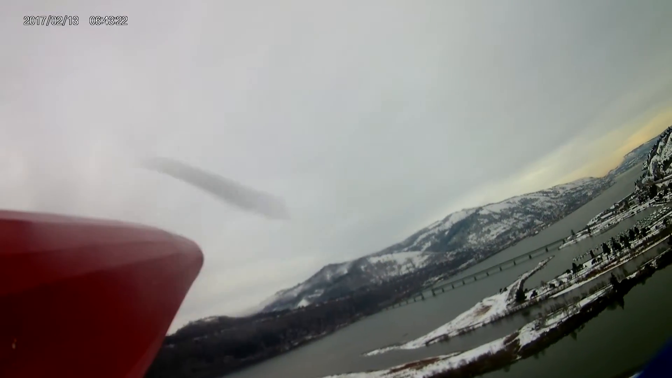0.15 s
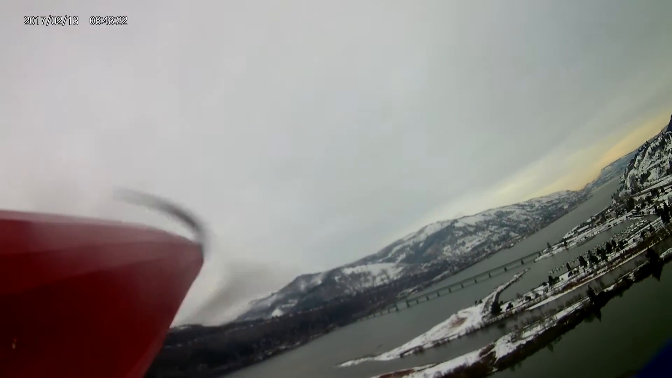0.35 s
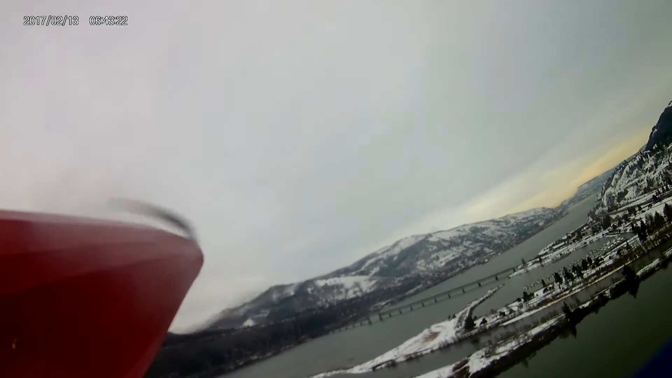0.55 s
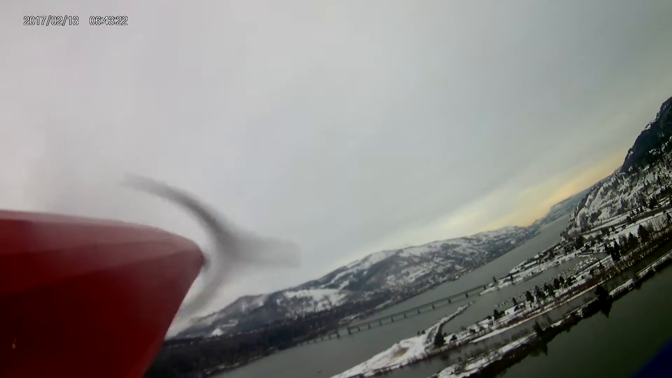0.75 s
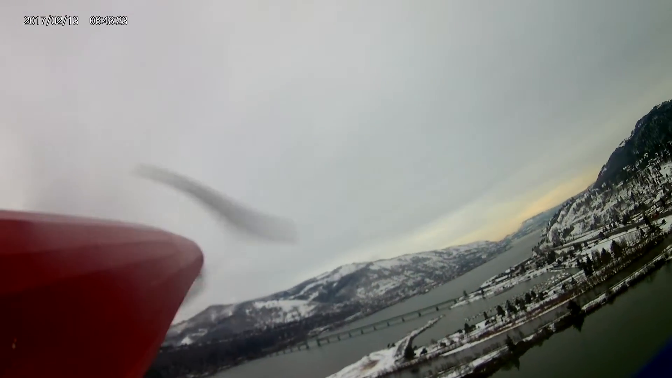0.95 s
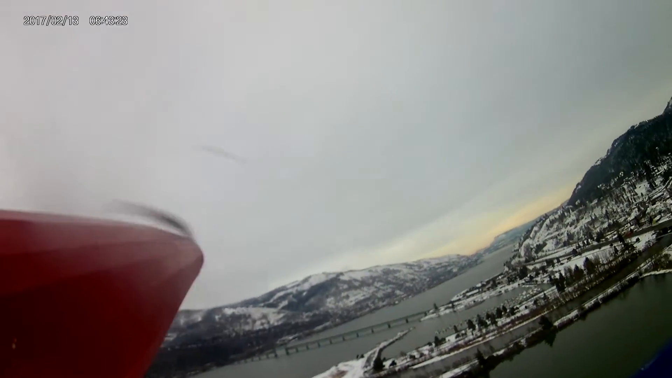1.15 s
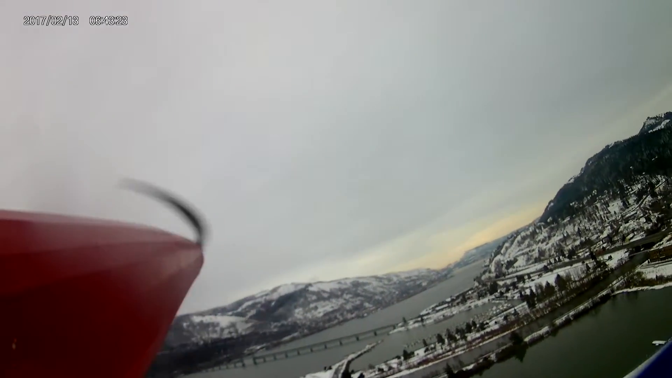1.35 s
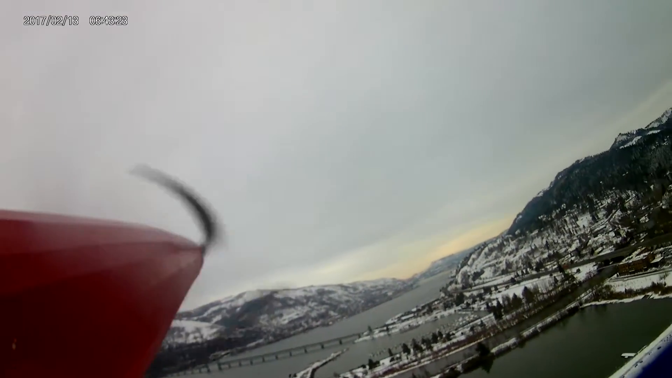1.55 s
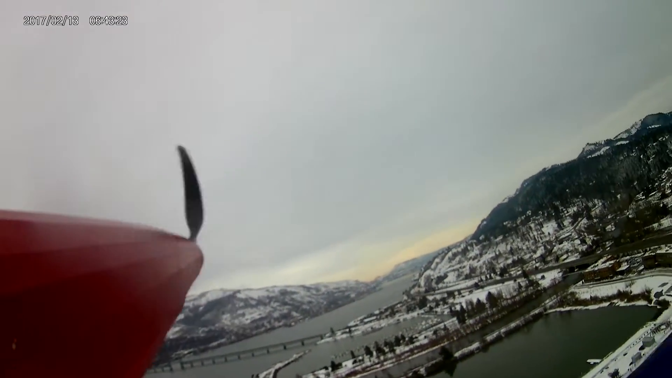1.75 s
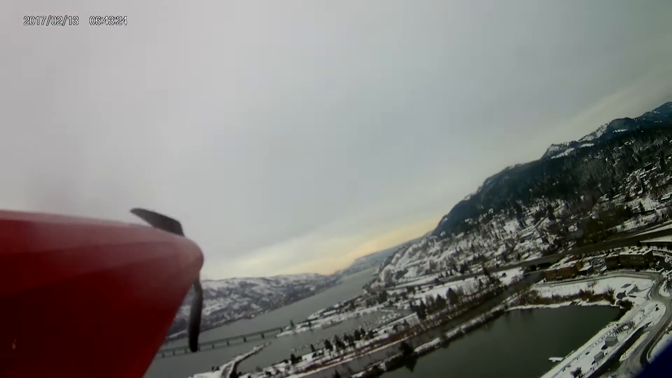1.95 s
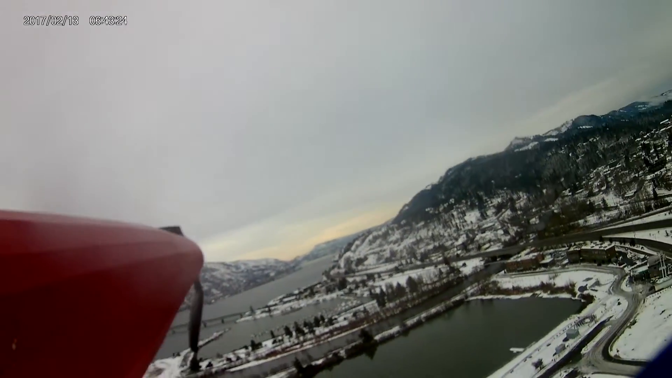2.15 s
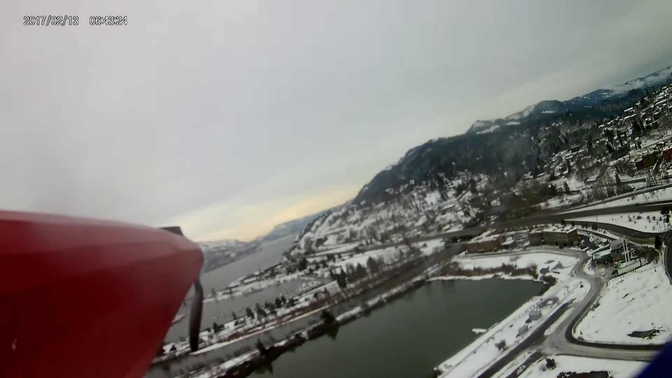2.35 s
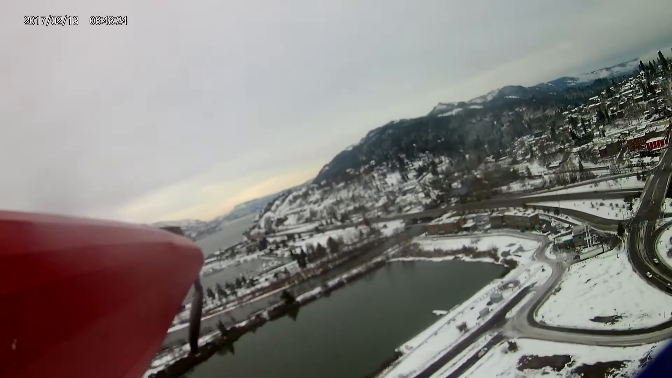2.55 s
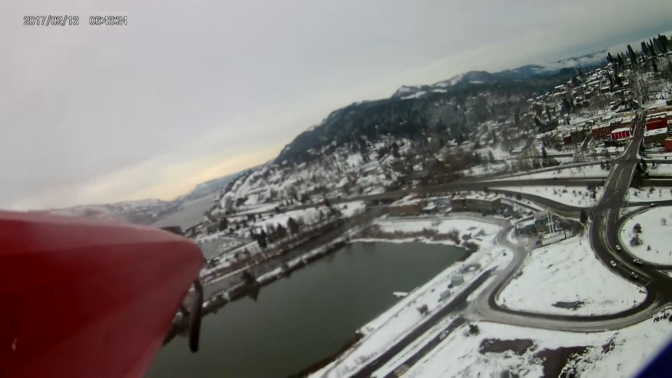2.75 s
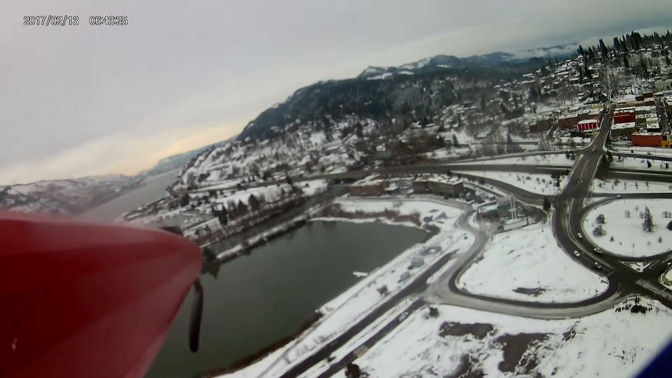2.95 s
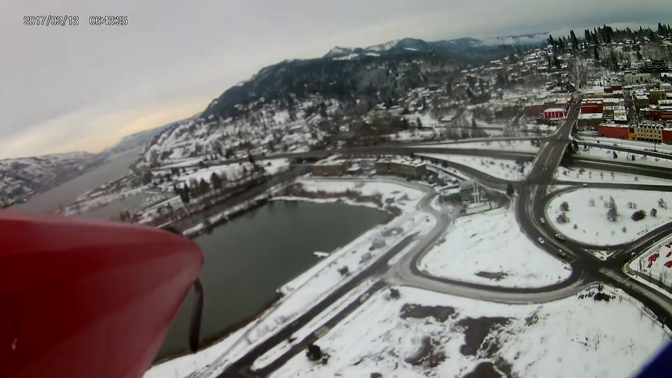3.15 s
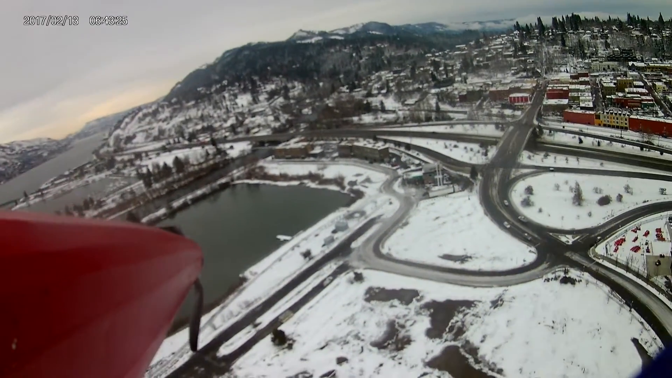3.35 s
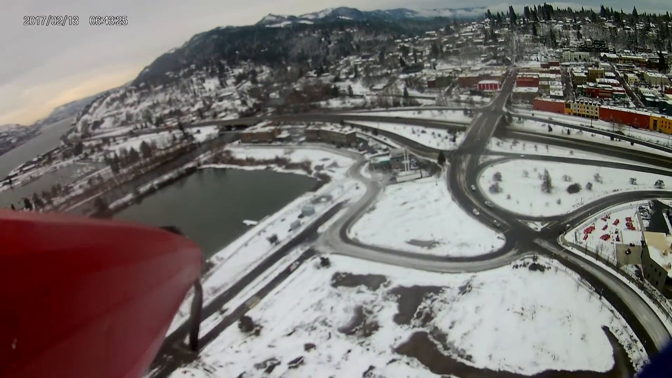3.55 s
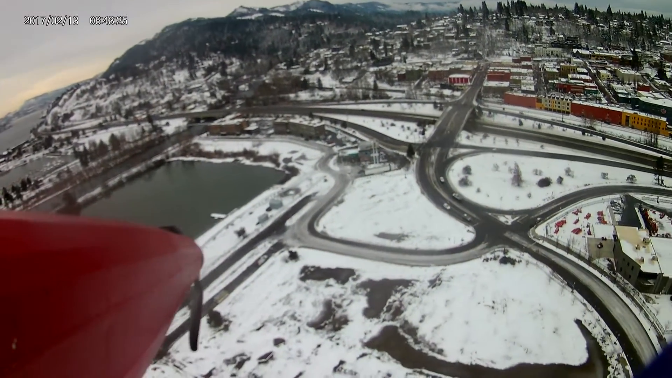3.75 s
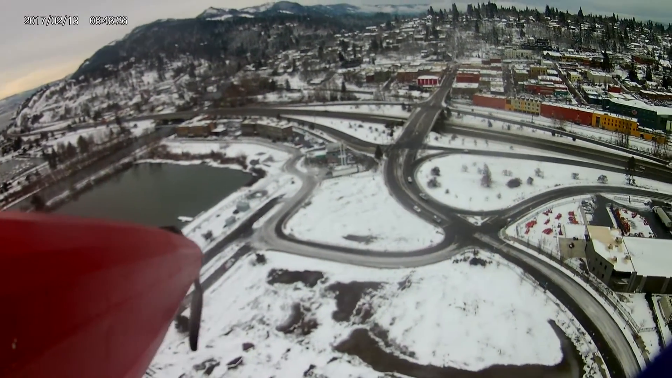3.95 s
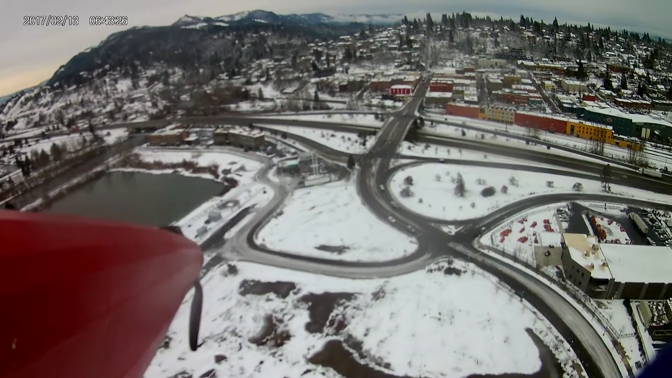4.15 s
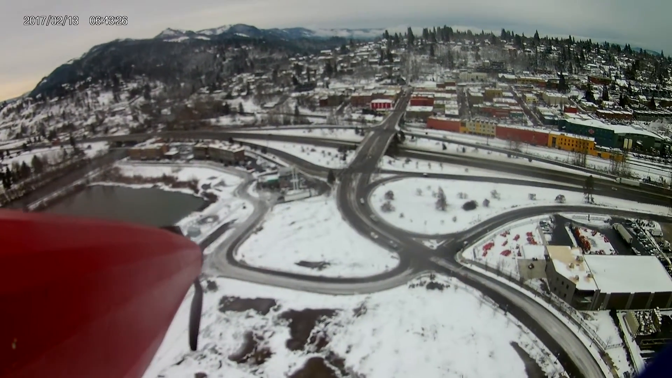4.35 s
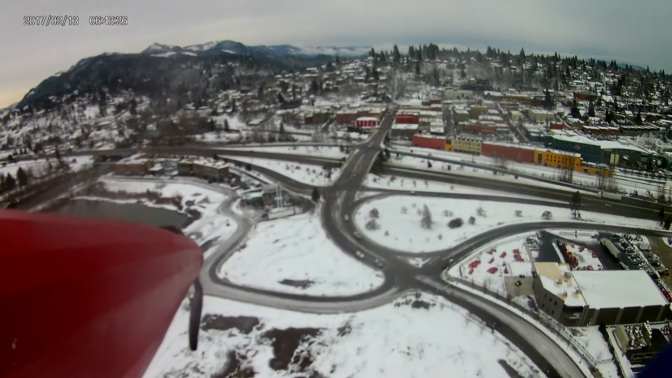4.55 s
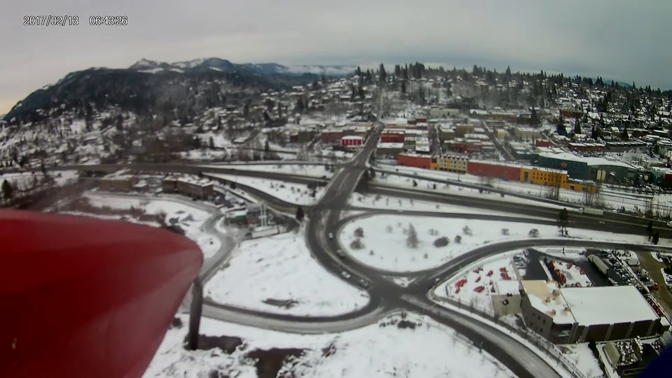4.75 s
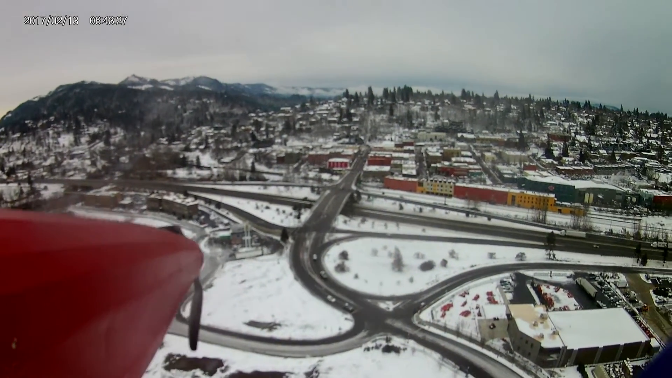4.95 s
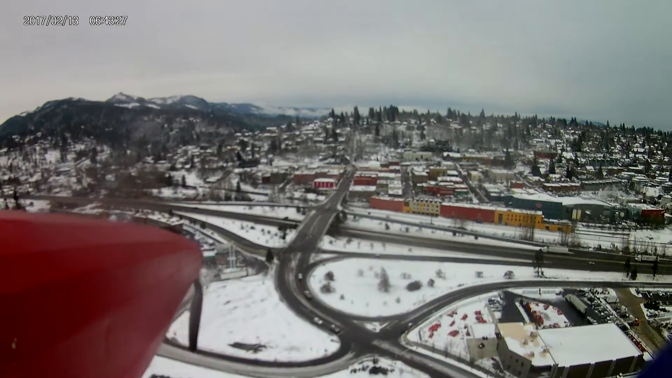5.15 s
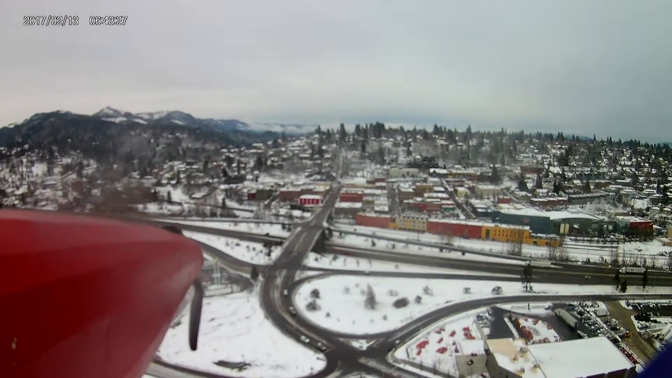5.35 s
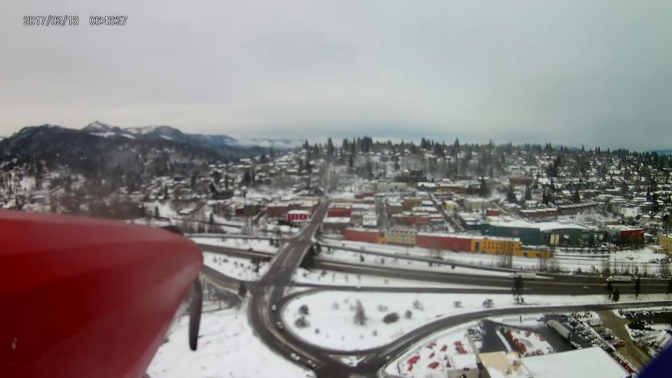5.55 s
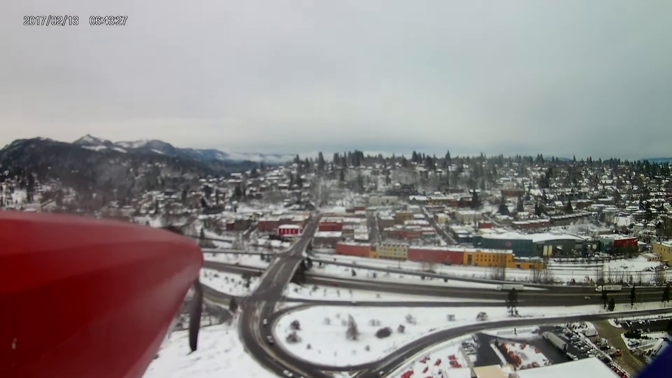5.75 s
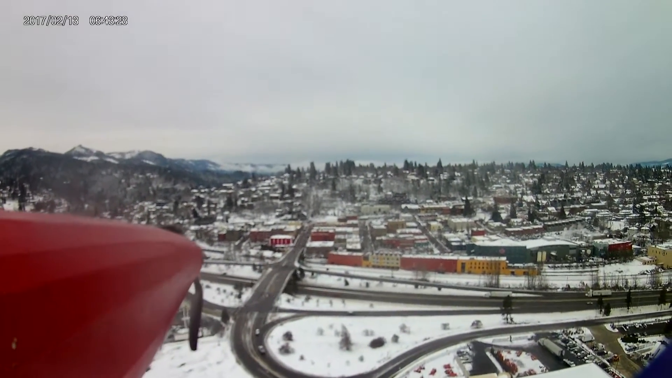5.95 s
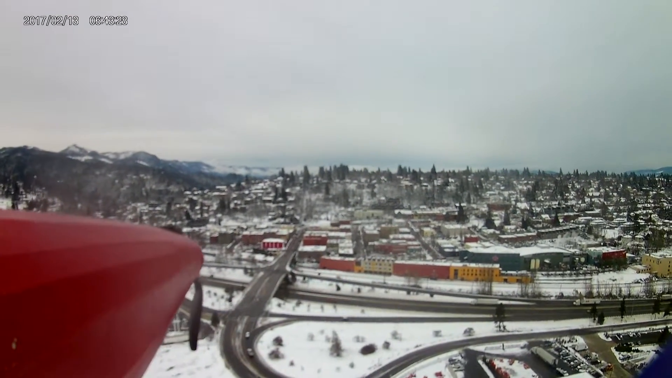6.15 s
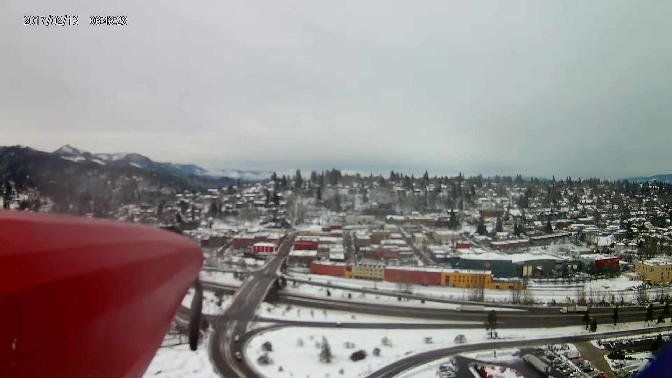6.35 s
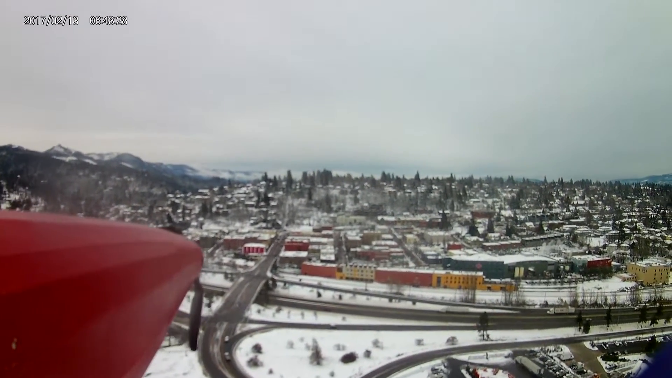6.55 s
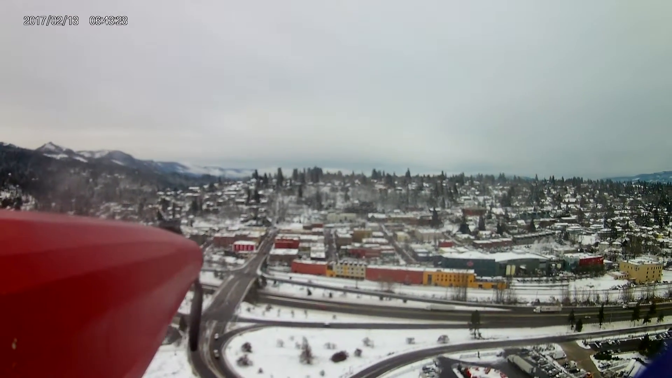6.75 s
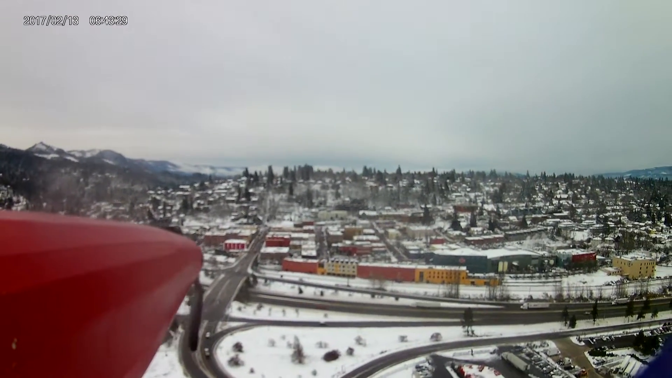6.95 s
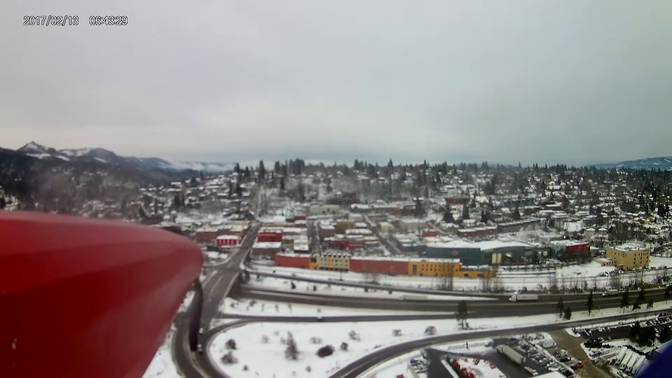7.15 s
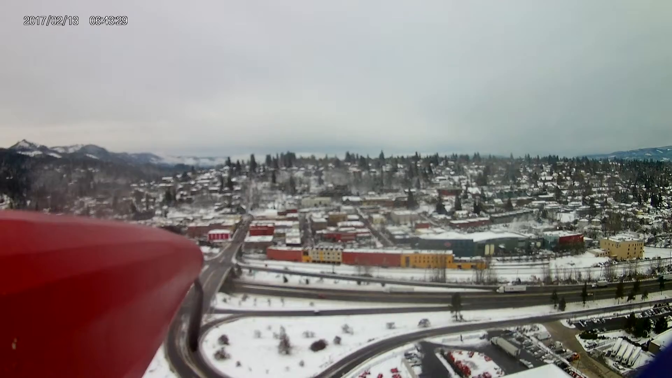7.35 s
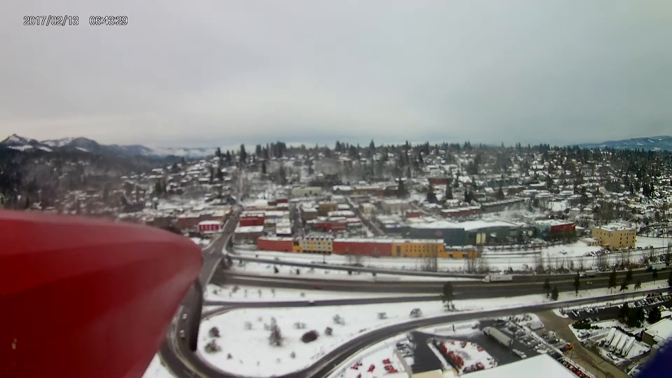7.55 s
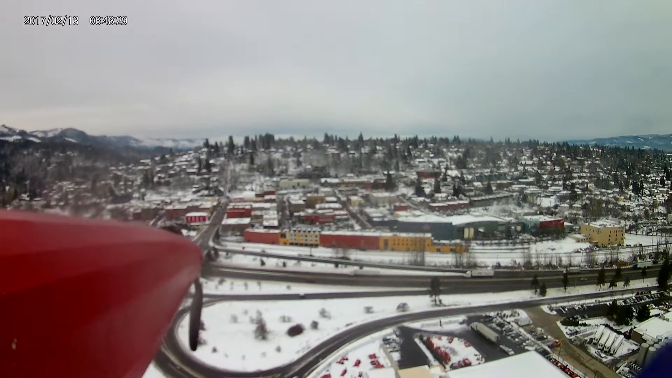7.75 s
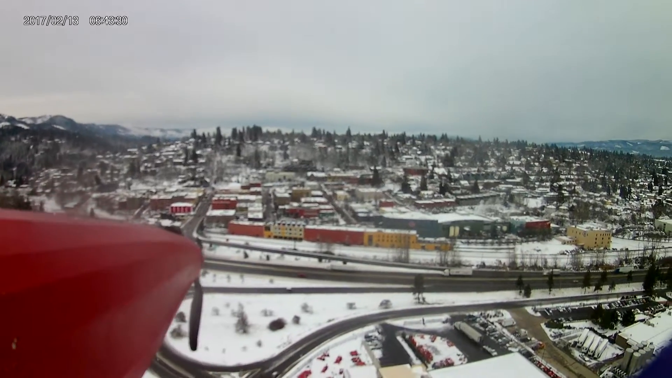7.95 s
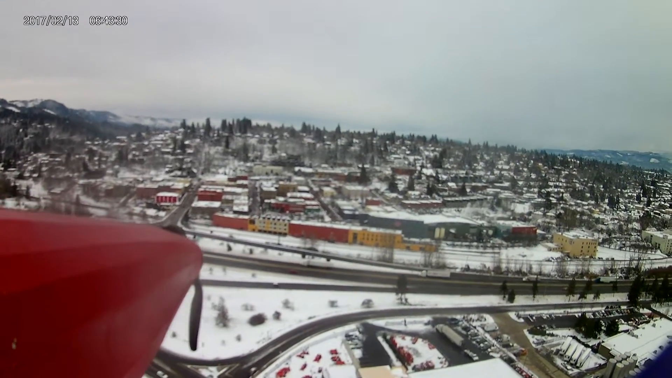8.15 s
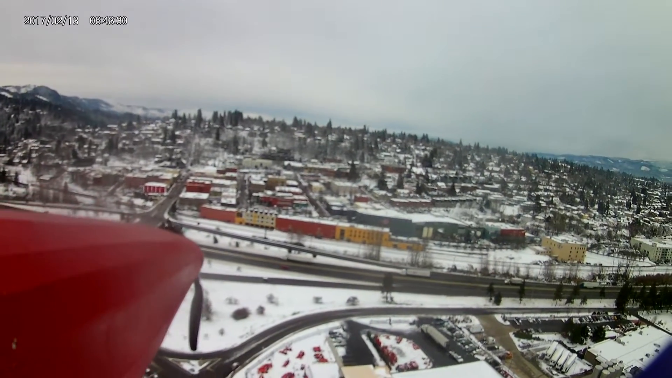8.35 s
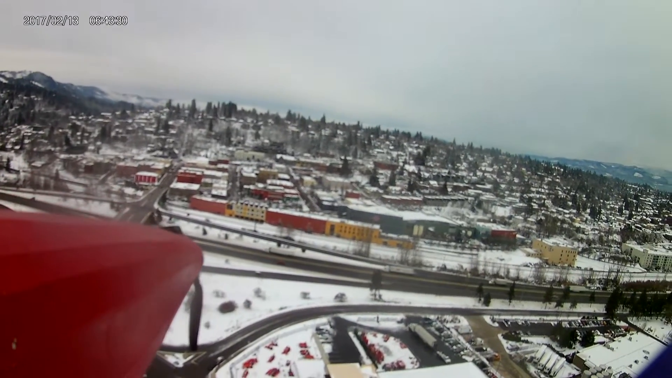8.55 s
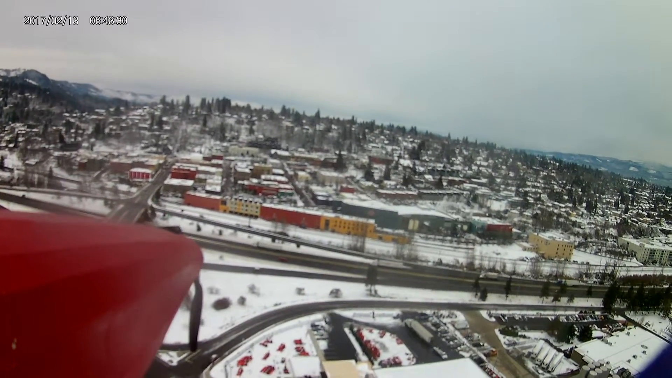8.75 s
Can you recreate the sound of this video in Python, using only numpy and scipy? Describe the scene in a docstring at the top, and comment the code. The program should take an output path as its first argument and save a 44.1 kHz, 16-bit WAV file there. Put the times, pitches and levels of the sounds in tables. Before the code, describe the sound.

A small electric motor and two-blade propeller buzz deeply and buffet the airframe, with two rougher swells. The pitch sags, then drops quickly through a braking chirp to nothing. Faint plastic ticks follow as the blades fold back. After that there is only wind over the glider, soft at first, building to a fuller, brighter rush, then easing. Close onboard microphone, outdoors, no echo.

```python
"""On board a model glider: an electric motor drives a two-blade folding propeller whose wash buffets the fuselage.
One shaft angle times the blade tones, the pulsing wash and hiss, and the motor whine; a speed controller sizzles.
The throttle closes, the brake stops the shaft with a falling chirp and the blades fold back with two ticks.
Then only air rushes over the airframe: banded noise, louder and brighter as the glider gathers speed."""
import sys
import numpy as np
from scipy import signal
from scipy.fft import rfft, irfft
from scipy.io import wavfile

SR = 44100
rng = np.random.default_rng(int(sys.argv[2]) if len(sys.argv) > 2 else 0)


def dump(signal):
    """Clip the signal to [-1, 1] and save it as 16-bit WAV at the path in sys.argv[1]."""
    limited = np.clip(np.atleast_2d(signal).T, -1, 1)
    pcm = np.round(limited * 32767).astype(np.int16)
    wavfile.write(sys.argv[1], SR, pcm)


N = 388080
TIME = np.arange(N) / SR

# Shaft under power, coasting, then braked. Each row: time in seconds, speed in turns per second.
SHAFT_SPEED = [(0, 132.4), (.42, 127.6), (.5, 123.7), (.88, 123.3), (1.04, 121.2), (1.21, 121.1),
               (1.31, 98), (1.44, 86.5), (1.57, 83.3), (1.68, 61), (1.74, 38), (1.755, 19), (1.82, 0)]
# Rough air met by the propeller. Each row: start in seconds, end in seconds, level added to the wash in dB.
ROUGH_AIR = [(-.05, .285, 6.5), (0.207, 0.262, 4.5), (0.698, 1.29, 6)]
# Propeller tones. Each row: multiple of the shaft rate, relative level in dB, waver in dB.
PROP_ORDERS = [(1, -9, 2.5), (2, 0.5, -0.16), (3, -20.5, 3), (4, -22.5, 3), (6, -34.5, 3.5),
               (13, -34.5, 3.5)]
# Turbulent wash on the fuselage. Each row: frequency in Hz, relative density in dB per Hz.
WASH_COLOUR = [(20, -26), (40, -14), (62, -6), (95, -1.5), (125, -5.5), (180, -0.5), (260, -7.5),
               (370, -7.5), (520, -21), (750, -23), (1200, -47), (3000, -73)]
# Hiss of the running motor. Each row: frequency in Hz, relative density in dB per Hz.
HISS_COLOUR = [(600, -21), (1700, 5), (2600, 2), (4000, -1), (5200, -2.5), (6500, -11), (8500, -16),
               (12000, -20.5)]
# Sizzle of the speed controller. Each row: frequency in Hz, relative density in dB per Hz.
SIZZLE_COLOUR = [(2000, -15), (5000, 3.5), (8500, -5), (12000, -4)]
# Strength of the airflow, following the airspeed. Each row: time in seconds, strength in dB.
AIRFLOW_STRENGTH = [(0, -30.5), (1.35, -32.5), (1.85, -40.5), (2.2, -43), (3.08, -43), (3.75, -36),
                    (4.7, -31.5), (5.55, -31.5), (6.45, -33), (7.3, -37), (8.8, -36)]
# Air at cruising strength. Each row: frequency in Hz, relative density in dB per Hz.
AIR_COLOUR = [(20, -9), (50, -2.5), (110, 0.76), (170, 0.5), (330, -2.5), (600, -5), (1000, -7.5),
              (1600, -10), (3000, -19.5), (4500, -22.5), (5500, -27), (6500, -33), (9000, -42),
              (12000, -49.5)]
# Faster air makes smaller eddies. Each row: frequency in Hz, gain in dB per dB of airflow.
AIR_GROWTH = [(40, 0.3), (120, 0.7), (300, 0.63), (700, 0.73), (1400, 1.0), (2800, 1.24), (5000, 1.26),
              (9000, 1.6)]
# Motor mount resonances swept by the braked windings. Each row: centre in Hz, width in Hz, level in dB.
MOUNT_MODES = [(227, 59, -28.5), (635, 150, -27), (814, 140, -37)]
# Folding blades touch the nose. Each row: time in seconds, level in dB.
FOLD_TICKS = [(1.9145, -39), (1.924, -34.5), (1.9265, -45), (2.0435, -41), (2.046, -45)]
# Tick of a blade. Each row: frequency in Hz, relative density in dB per Hz.
TICK_COLOUR = [(1000, -20), (3300, 3), (4900, 3), (7000, -12), (9000, -17), (11500, -9)]

REFERENCE_TURNS_PER_S = 124
# levels at reference speed in smooth air; exponents of shaft speed
TONE_DB, TONE_POWER = -14.5, 2.86
WASH_DB, WASH_POWER = -20.5, 3
HISS_DB, HISS_POWER = -37, 2.7
BUFFET_EDGE_S = 0.072
TONE_FOLLOWS, HISS_FOLLOWS = 0.63, 0.29  # shares of a buffet's dB
SIZZLE_DB, SIZZLE_PART_THROTTLE_DB = -58, 5.5  # at reference speed; added at part throttle
POWER_OFF_S, POWER_FADE_S = 1.715, 0.03
CRUISE_DB, AIR_DB = -32, -26
BRAKE_S, BRAKE_RISE_S = 1.65, 0.067
CUTOFF_HZ = 12100


def from_db(db):
    """Decibels to gain."""
    return 10 ** (np.asarray(db) / 20)


def rms_one(x):
    """Scale to rms 1."""
    return x / np.sqrt(np.mean(x ** 2) + 1e-20)


def in_time(rows):
    """A curve's value at every sample."""
    return np.interp(TIME, *np.transpose(rows))


def at_hz(points, hz):
    """Read a table on a log-frequency axis."""
    known_hz, values = np.transpose(points)
    return np.interp(np.log(np.maximum(hz, 1)), np.log(known_hz), values)


def ramp(s, length_s):
    """Rise from 0 to 1, centred on a moment."""
    return np.clip((TIME - s) / length_s + 0.5, 0, 1)


def drift(rate_hz):
    """Smooth random swings, low-passed near `rate_hz`; rms 1."""
    hz = np.fft.rfftfreq(N, 1 / SR)
    spectrum = rfft(rng.standard_normal(N))
    return rms_one(irfft(spectrum / (1 + (hz / rate_hz) ** 2), N))


def noise(colour):
    """Noise with the given spectrum; rms 1."""
    gain = from_db(at_hz(colour, np.fft.rfftfreq(N, 1 / SR)))
    return rms_one(irfft(rfft(rng.standard_normal(N)) * gain, N))


def octaves(x, count=9):
    """Split into overlapping octave bands that sum to the whole: (centre Hz, band)."""
    centres_hz = 40 * 2.0 ** np.arange(count)
    spectrum, hz = rfft(x), np.fft.rfftfreq(N, 1 / SR)
    bands = []
    for centre_hz in centres_hz:
        weight = at_hz(np.c_[centres_hz, centres_hz == centre_hz], hz)
        bands.append((centre_hz, irfft(spectrum * weight, N)))
    return bands


def speed():
    """Shaft speed relative to the reference speed."""
    return in_time(SHAFT_SPEED) / REFERENCE_TURNS_PER_S


def buffeting():
    """Extra dB while the inflow is rough."""
    extra_db = np.zeros(N)
    for start_s, end_s, db in ROUGH_AIR:
        extra_db += db * (ramp(start_s, BUFFET_EDGE_S) - ramp(end_s, BUFFET_EDGE_S))
    return extra_db


def propeller(angle):
    """Two blades give a strong second order; imbalance and uneven inflow add weaker, less steady ones."""
    tones = np.zeros(N)
    for multiple, level_db, waver_db in PROP_ORDERS:
        tone = np.sin(round(multiple) * angle + rng.uniform(0, 2 * np.pi))
        tones += from_db(level_db + waver_db * drift(14)) * tone
    level = from_db(TONE_DB + TONE_FOLLOWS * buffeting()) * speed() ** TONE_POWER
    return np.sqrt(2) * level * tones


def wash(angle, chop=0.4, lumpy_db=1.4):
    """Each passing blade throws a lump of turbulent air at the fuselage."""
    level = from_db(WASH_DB + buffeting() + lumpy_db * drift(13)) * speed() ** WASH_POWER
    blade_pulse = 1 + chop * np.sin(2 * angle)
    return level * rms_one(noise(WASH_COLOUR) * blade_pulse)


def motor(angle, chop=0.18, whine_db=-48, whine_waver_db=1.8):
    """Hiss pulsing with the blades and a commutation whine (14 poles, 3 phases: 42 steps a turn)."""
    hiss_level = from_db(HISS_DB + HISS_FOLLOWS * buffeting()) * speed() ** HISS_POWER
    hiss = hiss_level * noise(HISS_COLOUR) * (1 + chop * np.sin(2 * angle))
    load = speed() ** 3  # sets the whine's amplitude
    whine = load * from_db(whine_db + whine_waver_db * drift(15)) * np.sin(42 * angle)
    return hiss + np.sqrt(2) * whine


def controller(part_throttle=0.75):
    """The speed controller sizzles until it switches off, more when it chops the current at part throttle."""
    chopping = np.interp(speed(), [part_throttle, 1], [1, 0])
    powered = 1 - ramp(POWER_OFF_S, POWER_FADE_S)
    level = from_db(SIZZLE_DB + SIZZLE_PART_THROTTLE_DB * chopping)
    return powered * level * noise(SIZZLE_COLOUR)


def airflow(gust_db=0.31, eddy_db=0.5, flutter_db=1.3, flutter_hz=3500):
    """Turbulence over the airframe: the treble grows fastest with speed and flutters as one."""
    excess_db = in_time(AIRFLOW_STRENGTH) - CRUISE_DB + gust_db * drift(6.6)
    flutter = flutter_db * drift(45)
    rush = np.zeros(N)
    for hz, band in octaves(noise(AIR_COLOUR)):
        treble_share = hz / (hz + flutter_hz)
        band_db = at_hz(AIR_GROWTH, hz) * excess_db + eddy_db * drift(27) + treble_share * flutter
        rush += band * from_db(band_db)
    return from_db(AIR_DB) * rush


def brake(angle, rough=0.51):
    """The braked windings sing a falling chirp that swells at each resonance of the motor mount."""
    hz, winding = 13 * in_time(SHAFT_SPEED), np.sin(13 * angle)
    response = np.zeros(N)
    for centre_hz, width_hz, db in MOUNT_MODES:
        response += from_db(db) / (1 + (2 * (hz - centre_hz) / width_hz) ** 2)
    braking = ramp(BRAKE_S, BRAKE_RISE_S) * (hz > 0)  # silent once stopped
    return np.sqrt(2) * braking * response * winding * (1 + rough * drift(90))


def folding_blades(t60_s=0.026):
    """Short dry ticks of plastic on the nose: noise with instant onsets and exponential decay."""
    envelope = np.zeros(N)
    for start_s, db in FOLD_TICKS:
        decay_db = 60 * np.maximum(TIME - start_s, 0) / t60_s
        envelope += (TIME >= start_s) * from_db(db - decay_db)
    return envelope * noise(TICK_COLOUR)


def scene():
    """One shaft angle drives the propeller, its wash, the motor and the brake."""
    angle = 2 * np.pi * np.cumsum(in_time(SHAFT_SPEED)) / SR
    drive = propeller(angle) + wash(angle) + motor(angle) + controller()
    return (drive + airflow() + brake(angle) + folding_blades())[None]


def record(dry, thinned_hz=7950, thinned_width_hz=900):
    """Final shaping: the loudest peaks are rounded, a band near 8 kHz is thinned, and the top is cut."""
    rounded = dry / (1 + dry ** 8) ** (1 / 8)
    faded_in = rounded * np.minimum(TIME / 0.002, 1)
    band_b, band_a = signal.iirnotch(thinned_hz, thinned_hz / thinned_width_hz, fs=SR)
    thinned = signal.lfilter(band_b, band_a, faded_in)
    # order 14, ripple 0.1 dB, stopband 80 dB down
    top_cut = signal.ellip(14, 0.1, 80, CUTOFF_HZ, fs=SR, output="sos")
    return signal.sosfilt(top_cut, thinned)


dry = scene()
out = record(dry)
dump(out)
```